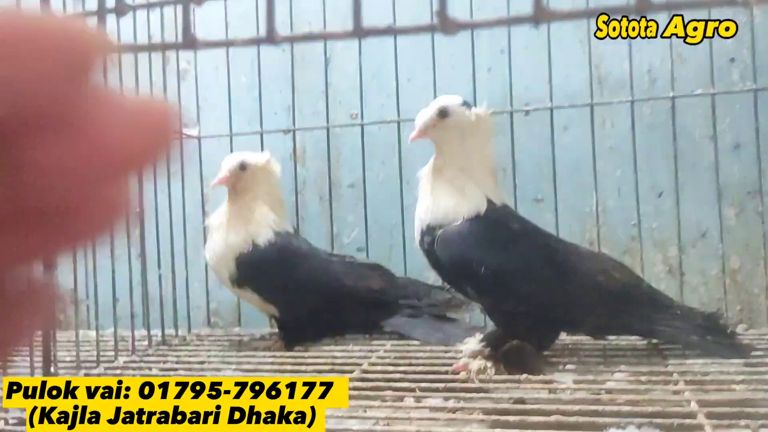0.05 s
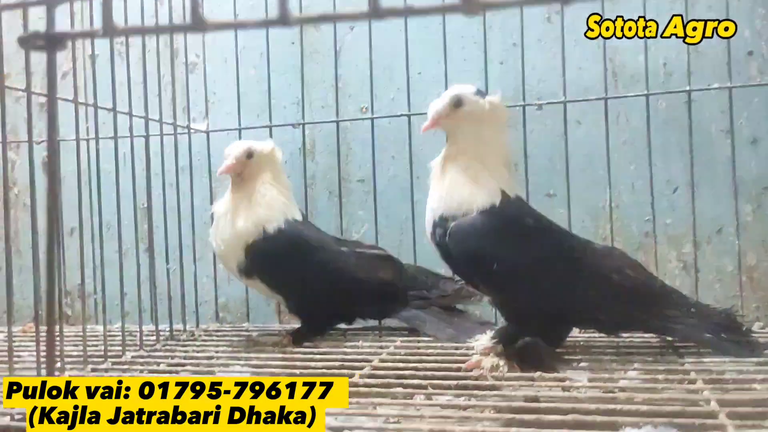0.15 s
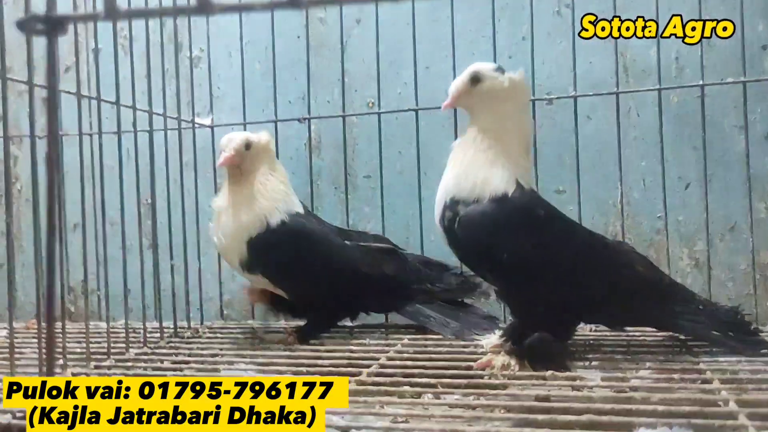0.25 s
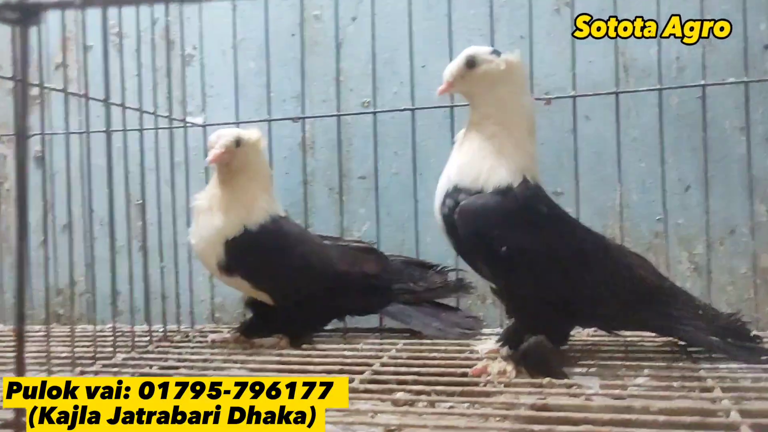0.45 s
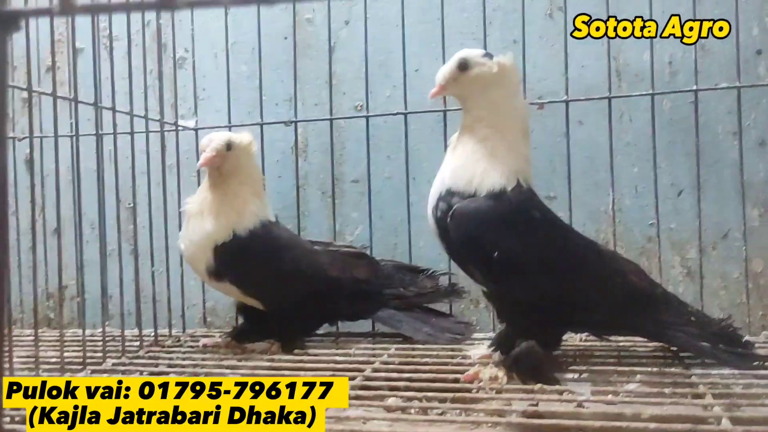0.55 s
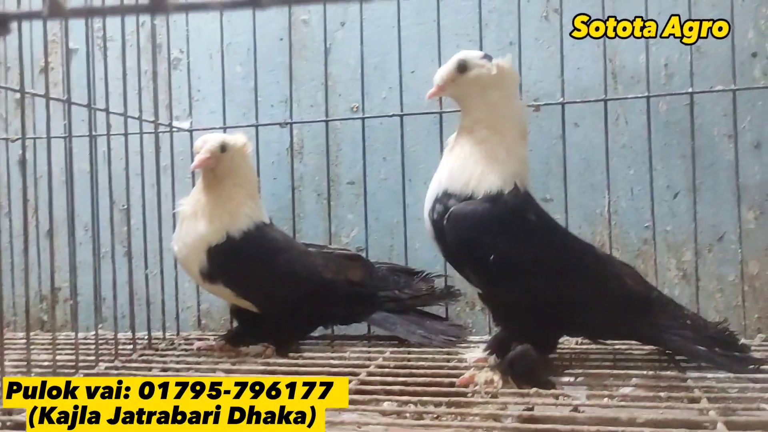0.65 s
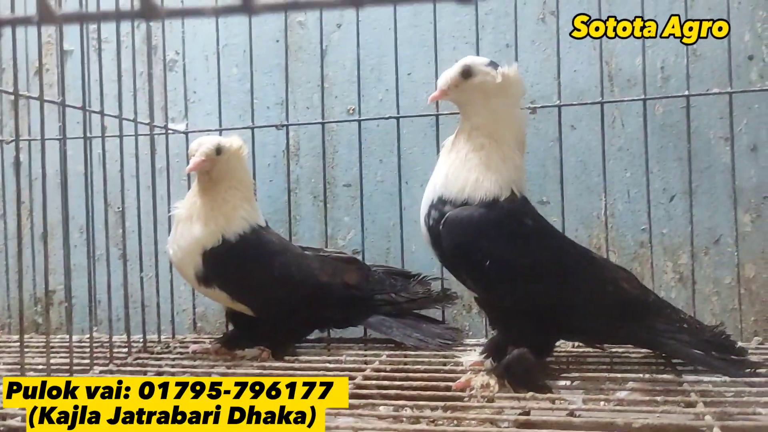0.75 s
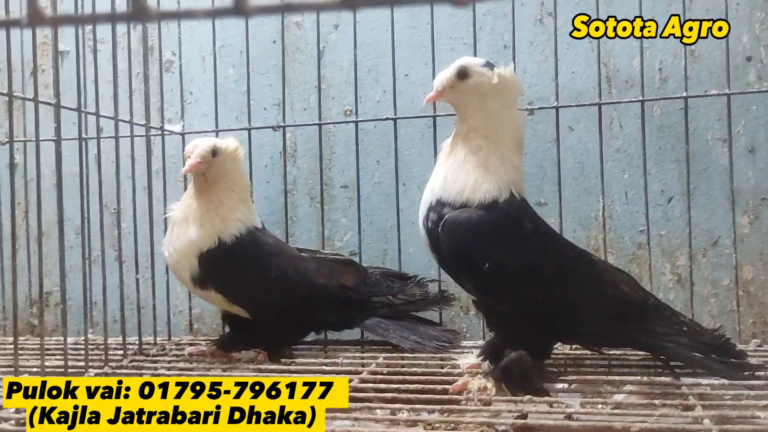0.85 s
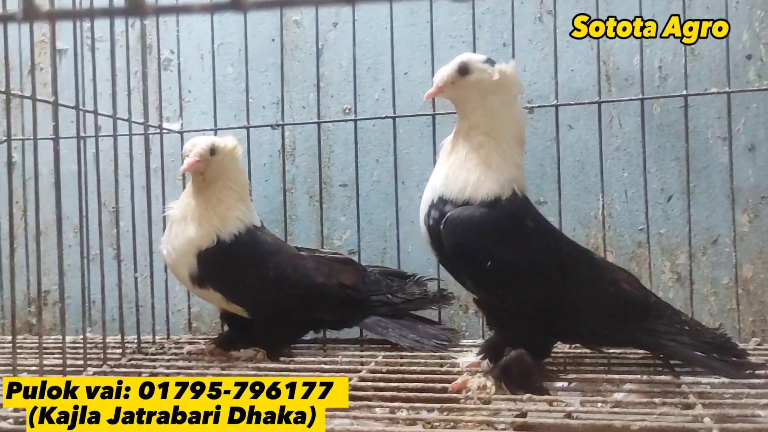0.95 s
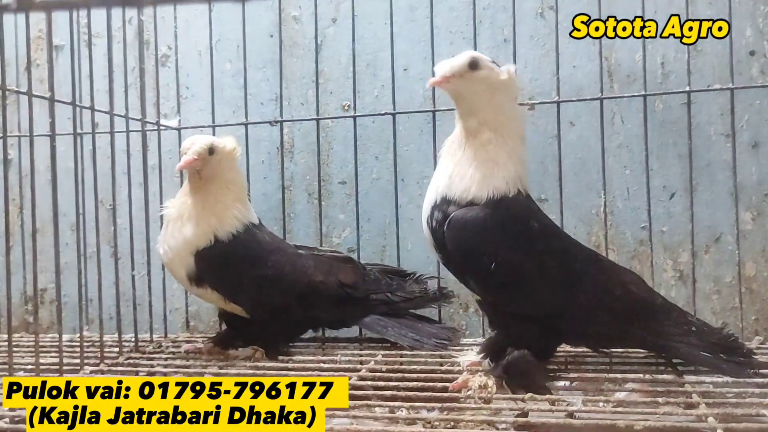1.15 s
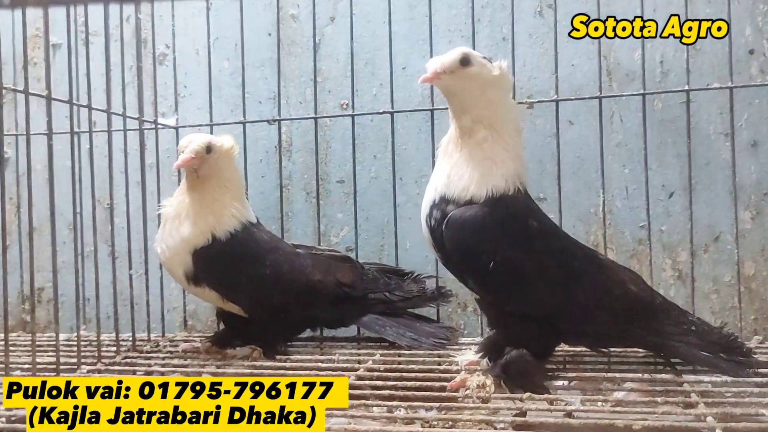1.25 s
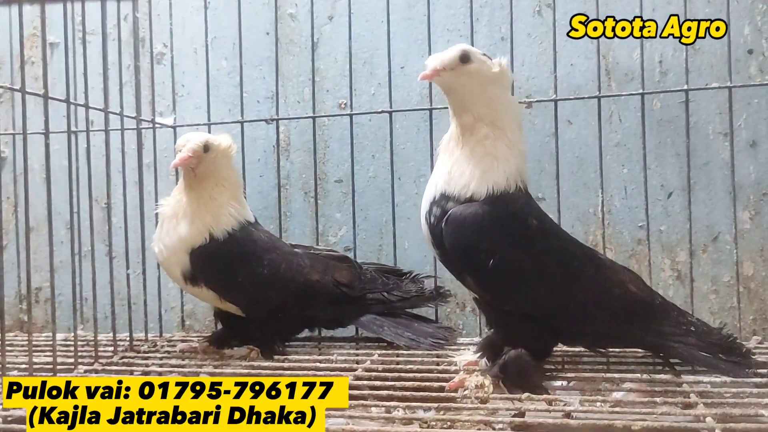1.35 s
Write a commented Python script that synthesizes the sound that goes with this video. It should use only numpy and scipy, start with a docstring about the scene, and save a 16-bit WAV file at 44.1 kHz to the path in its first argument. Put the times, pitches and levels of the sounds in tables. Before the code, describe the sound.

Low, breathy pigeon cooing starts after a brief quiet moment, rolls in quick pulses to a loud peak and dies away; a faint wing sweep and weak coo follow, over distant chirps and quiet low hum, one channel.

```python
"""A loft of wire cages: pigeons coo near and far, with small birds whistling outside.
Close to the microphone one bird throbs low, a wavering tone with breath around it; farther birds hold
softer tones. The flock murmurs behind as throbbing noise, over still air and a low hum with its third
harmonic. Feathers rustle and wings beat as swells of grainy noise; sharp broadband clicks fall, many at
the loud throbs. Pigeons, whistles and wings take on the sparse, short echoes of the loft."""
import sys
import numpy as np
from scipy import signal
from scipy.fft import rfft, irfft
from scipy.io import wavfile

SR = 44100
rng = np.random.default_rng(int(sys.argv[2]) if len(sys.argv) > 2 else 0)


def volts(x):
    """Linear amplitude factor 10**(x/20) for a level x in dB, scalar or array-like."""
    e = np.asarray(x, float) / 20
    return 10 ** e


def to_wav(sig):
    """Store sig (one row per channel, or 1-D mono) as 16-bit WAV at the path in sys.argv[1].

    Samples outside -1..1 are clipped; the rate is SR.
    """
    pcm = np.clip(np.atleast_2d(sig), -1, 1) * 32767
    pcm = np.round(pcm).astype(np.int16)
    wavfile.write(sys.argv[1], SR, pcm.T)  # frames by channels


N = 61739  # samples, 1.4 s


def seconds():
    """Time of every sample in seconds."""
    return np.arange(N) / SR


def evened(x):
    """Scales to rms 1."""
    return x / np.sqrt(np.mean(x ** 2) + 1e-20)


def slow(count, hz):
    """Smooth random wandering, rolled off above hz, rms about 1."""
    padded = count + 8192  # the spare samples keep the end from wrapping onto the start
    spectrum = rfft(rng.standard_normal(padded))
    rolloff = 1 + (np.fft.rfftfreq(padded, 1 / SR) / hz) ** 4
    return evened(irfft(spectrum / rolloff))[:count]


def coloured(x, points, stretch=1):
    """Filters x by a spectrum of (Hz, dB) points, its frequencies multiplied by stretch."""
    point_hz, point_db = np.transpose(points)
    hz = np.fft.rfftfreq(len(x), 1 / SR)
    gain_db = np.interp(np.log(hz + 1), np.log(point_hz * stretch), point_db)
    return irfft(rfft(x) * volts(gain_db), len(x))


def gate(start, length, edge):
    """A soft rise centred on the start, a hold, and a soft fall centred on the end."""
    t = seconds()
    nearest_end = np.minimum(t - start, start + length - t)
    return np.sin(np.pi / 2 * np.clip(nearest_end / edge + .5, 0, 1)) ** 2


def glide(start, length, from_hz, to_hz):
    """Running phase of a straight glide in pitch, from a random starting phase."""
    hz = np.interp(seconds(), [start, start + length], [from_hz, to_hz])
    return 2 * np.pi * (np.cumsum(hz) / SR + rng.random())


# Still air of the loft. Each row: frequency in Hz, relative level in dB per Hz.
AIR_SPECTRUM = [(20, 8), (53, -14.5), (100, -13), (400, -11.5), (720, -23.5), (1420, -34), (3240, -39),
                (4660, -44.5), (6000, -49), (8000, -52), (12000, -58.5), (15500, -65)]
AIR_DB = -42.5  # rms


def still_air():
    """Steady noise, strongest in the bass and thinning towards the treble."""
    return volts(AIR_DB) * evened(coloured(rng.standard_normal(N), AIR_SPECTRUM))


# Swells of the low hum under the loft. Each row: time in seconds, level in dB.
HUM_SWELLS = [(0, -50.5), (0.198, -41.5), (.3, -37.5), (.4, -50.5), (0.571, -38.5), (0.699, -45),
              (1.4, -48.5)]
HUM_HZ, HUM_DRIFT, HUM_DRIFT_HZ = 48.6, .025, 7.2  # pitch, rms drift as a fraction, speed of the drift
HUM_WAVER_DB, HUM_WAVER_HZ = 2.2, 16  # rms wavering of the level, and its speed
FIRST_DB, THIRD_DB = 0.0057, -14  # fundamental and third harmonic


def hum():
    """A low hum and its third harmonic, wavering in level and pitch."""
    s, db = np.transpose(HUM_SWELLS)
    hz = HUM_HZ * (1 + HUM_DRIFT * slow(N, HUM_DRIFT_HZ))
    phase = 2 * np.pi * np.cumsum(hz) / SR
    level = volts(np.interp(seconds(), s, db) + HUM_WAVER_DB * slow(N, HUM_WAVER_HZ))
    harmonics = volts(FIRST_DB) * np.sin(phase) + volts(THIRD_DB) * np.sin(3 * phase)
    return np.sqrt(2) * level * harmonics  # the root of 2 makes the levels rms


# Cooing of the flock behind. Each row: time in seconds, level in dB.
FLOCK_LEVELS = [(0, -39), (.06, -46), (.2, -30), (0.402, -32.5), (0.621, -26.5), (.8, -26), (.95, -28.5),
                (1.12, -40), (1.3, -37), (1.4, -32)]
# Spectrum of that cooing. Each row: frequency in Hz, relative level in dB per Hz.
FLOCK_SPECTRUM = [(90, -45), (150, -32), (232, -7.5), (320, 1), (414, 1), (520, -12.5), (650, -19.5),
                  (850, -31), (1300, -40.5), (2200, -84.5)]
FLOCK_THROB_DB, FLOCK_THROB_HZ = 2.8, 25  # rms depth and speed of the throbbing


def flock():
    """Many throats at once: a low band of noise that throbs."""
    s, db = np.transpose(FLOCK_LEVELS)
    throb = volts(np.interp(seconds(), s, db) + FLOCK_THROB_DB * slow(N, FLOCK_THROB_HZ))
    return throb * evened(coloured(rng.standard_normal(N), FLOCK_SPECTRUM))


# Whistles of small birds outside.
# Each row: start in seconds, length in seconds, start pitch in Hz, end pitch in Hz, roughness from 0 to 1.
WHISTLES = [(.0, .42, 2960, 2940, .4), (.32, .13, 2810, 2780, .5), (.12, .17, 4170, 4200, .7),
            (.19, .23, 3500, 3470, .55), (.3, .08, 4030, 4000, .55), (.49, .07, 1470, 1470, .5),
            (.555, .17, 4030, 3980, .8), (.865, .075, 3650, 3590, .6), (.93, .055, 4970, 4800, .6),
            (.96, .065, 4600, 4500, .5), (1.01, .06, 4260, 4170, .6), (1.05, .095, 4130, 3830, 1),
            (1.01, .13, 3420, 3280, .75), (.04, .09, 3550, 3500, .6), (.5, .09, 2800, 2790, .45),
            (.475, .075, 4150, 4050, .9), (.31, .12, 4520, 4470, .7)]
# Level of each whistle before its swell and fade. Each row: level in dB.
WHISTLE_LEVELS = [-55, -56, -60.5, -59.5, -59.5, -58.5, -60, -57, -67, -62, -53, -54.5, -65.5, -63.5, -67,
                  -62.5, -67]
WHISTLE_EDGE_S, WHISTLE_SPREAD_HZ, WHISTLE_FADE_DB = .025, 260, -5


def whistle(start, length, from_hz, to_hz, rough, db):
    """A thin tone that swells and fades, blurred by echoes into a fluttering band."""
    phase = glide(start, length, from_hz, to_hz)
    spread_hz = WHISTLE_SPREAD_HZ * rough ** 1.5
    in_step = (1 - rough + rough * slow(N, spread_hz)) * np.sin(phase)
    out_of_step = rough * slow(N, spread_hz) * np.cos(phase)
    # loudest at two fifths of the length
    fade_db = WHISTLE_FADE_DB * abs(2 * (seconds() - start) / length - .8)
    return volts(db + fade_db) * gate(start, length, WHISTLE_EDGE_S) * evened(in_step + out_of_step)


# Held coos of pigeons farther off.
# Each row: start in seconds, length in seconds, start pitch in Hz, end pitch in Hz, level in dB before throbbing.
FAR_COOS = [(0.056, 0.03, 499.7, 493, -30.5), (0.08, 0.086, 312.6, 315, -33), (0.099, 0.038, 622, 626, -30),
            (0.124, 0.079, 495, 484, -33.5), (0.127, .08, 719, 684, -38.5),
            (0.222, 0.12, 504.4, 477.6, -34.5), (0.097, .17, 789, 817, -50),
            (0.444, 0.068, 676, 688, -34.5), (0.501, 0.074, 610, 620, -39.5),
            (0.781, 0.17, 284.8, 271.7, -28), (0.991, 0.081, 355.5, 415, -25.5),
            (1.243, 0.093, 788, 933, -47.5), (1.349, 0.03, 553, 547, -35.5)]
COO_THROB_HZ, COO_THROB, COO_EDGE_S = 50, .35, .016  # speed and rms depth of the throb, soft edge
COO_HOARSE = .4  # rms wandering of the phase in radians


def far_coo(start, length, from_hz, to_hz, db):
    """A soft held tone that throbs unevenly, made hoarse by a wandering phase."""
    throb = 1 + COO_THROB * slow(N, COO_THROB_HZ)
    phase = glide(start, length, from_hz, to_hz) + COO_HOARSE * slow(N, COO_THROB_HZ)
    return volts(db) * gate(start, length, COO_EDGE_S) * throb * np.sin(phase)


# Throbs of the coos close to the microphone. Each row: middle in seconds, peak level in dB before the rattle,
# pitch in Hz before the waver, width in seconds at half amplitude.
NEAR_THROBS = [(0.241, -18.5, 331.6, 0.041), (0.275, -16.5, 329.9, 0.06845), (0.311, -17, 335.6, 0.083),
               (0.341, -15, 337.3, 0.015), (0.372, -19, 312.3, 0.025), (.405, -26.5, 319.9, 0.0093),
               (0.447, -23.5, 305.2, 0.025), (0.477, -16.5, 326.2, 0.023), (0.492, -17, 322.4, 0.011),
               (0.504, -17, 348.7, 0.0094), (0.519, -17, 329.6, 0.012), (0.552, -16.5, 294.1, 0.0069),
               (0.562, -15.5, 291.1, 0.0091), (0.581, -19.5, 388.5, 0.007), (0.625, -16, 282.6, 0.01766),
               (0.657, -20, 384.5, 0.011), (0.672, -13, 376.9, 0.014), (0.685, -16, 332.6, 0.009),
               (0.696, -15, 364.1, 0.008), (0.714, -14.5, 354.7, 0.008), (0.74, -9.5, 384.7, 0.022),
               (0.756, -9, 375.7, 0.016), (0.772, -15, 363.6, 0.009), (0.792, -4, 386.6, 0.014),
               (0.819, -7.5, 384.8, 0.015), (0.86, -11, 340.5, 0.024), (0.893, -15, 413.2, 0.013),
               (0.911, -12, 399.1, 0.013), (0.93, -8.5, 381.8, 0.016), (0.976, -11.5, 373.3, 0.017),
               (1.05, -17.5, 402.2, 0.026), (1.087, -22.5, 381.6, 0.0093), (1.113, -18, 371.9, 0.021),
               (1.348, -21, 354.7, 0.013), (1.382, -23.5, 367.6, 0.04)]
WAVER, WAVER_HZ = 0.014, 60.7  # rms waver of the pitch as a fraction, and its speed
BREATH_DB, BREATH_WIDTH_HZ = -11.5, 88.6  # breath relative to the tone, and its spread about the pitch
RATTLE_HZ, RATTLE, RATTLE_END_S, RATTLE_EDGE_S = 76, .22, .55, .27  # flutter of the throat in the early coos


def near_pigeon():
    """An almost pure tone from the swollen throat, pressed out in throbs, with breath around it."""
    t = seconds()
    s, db, hz, width = np.array(NEAR_THROBS).T[:, :, None]
    bells = volts(db) ** 2 * np.exp(-np.log(4) * (2 * (t - s) / width) ** 2)
    power = bells + 1e-12 / (1 + abs(t - s))  # the trace of power keeps a pitch defined in the gaps
    total = power.sum(0)
    pitch = (power * hz).sum(0) / total * (1 + WAVER * slow(N, WAVER_HZ))
    phase = 2 * np.pi * np.cumsum(pitch) / SR
    flutter = np.sin(2 * np.pi * RATTLE_HZ * t)
    rattle = 1 + RATTLE * gate(0, RATTLE_END_S, RATTLE_EDGE_S) * flutter
    breath = slow(N, BREATH_WIDTH_HZ) * volts(BREATH_DB)
    return np.sqrt(total) * (rattle * np.sin(phase) + breath * np.cos(phase))


WHOOSH_DB, WHOOSH_WIDTH_HZ = 6, 180  # lift of the noise around the whoosh, and its reach


def feathers(start, length, db, spectrum, stretch=1, whoosh_hz=0):
    """Grainy air through feathers: a soft swell and fall, with a breathy pitch where the wing sweeps."""
    u = np.clip((seconds() - start) / length, 0, 1)
    grain = rng.standard_normal(N) * volts(2.5 * slow(N, 250))  # flutters by 2.5 dB rms
    away = (np.fft.rfftfreq(N, 1 / SR) - whoosh_hz) / WHOOSH_WIDTH_HZ
    whoosh = irfft(rfft(grain) * volts(WHOOSH_DB * np.exp(-away ** 2)), N)
    swell = abs(np.sin(np.pi * u ** .72)) ** 1.5  # rises faster than it falls
    return volts(db) * swell * evened(coloured(whoosh, spectrum, stretch))


# Feather rustles in the cages. Each row: start in seconds, length in seconds, level in dB.
RUSTLE_TIMES = [(0.239, .11, -56.5), (0.452, 0.14, -60), (0.593, 0.1, -59.5)]
# Spectrum of a rustle. Each row: frequency in Hz, relative level in dB per Hz.
RUSTLE_SPECTRUM = [(800, -34), (2000, -4), (4000, -5), (5500, -13.5), (7000, -7.5), (8300, -26.5),
                   (9500, -17), (12000, -36.5)]


def rustles():
    """Feathers rustling: short bright swells of grainy noise."""
    return sum(feathers(*row, RUSTLE_SPECTRUM) for row in RUSTLE_TIMES)


# Sharp broadband clicks, many at the loud throbs.
# Each row: time in seconds, level in dB before the click spectrum, top of the snap in Hz.
CLICKS = [(.351, -40, 11000), (.632, -37, 14000), (.671, -36, 9500), (.732, -41, 7500), (.738, -41, 7500),
          (.756, -31, 9500), (.763, -41, 10000), (.798, -28, 9500), (.816, -33, 7500), (.823, -34, 7500),
          (.841, -35, 10000), (.861, -32, 15000), (.868, -33, 13500), (.926, -27, 8700), (.946, -38, 8500),
          (1.051, -39, 12000)]
# Spectrum of the clicks. Each row: frequency in Hz, gain in dB.
CLICK_SPECTRUM = [(500, -18), (1200, 8), (3000, 5), (5000, 0), (8000, -3), (15000, -8)]
CLICK_T60_S, CLICK_TAIL_DB = .009, -21  # time for the tail to fall 60 dB, and its start below the snap
FAINT_PER_S, FAINT_DB = 30, -47  # faint clicks: average rate, level before the click spectrum


def clicks():
    """Each click is a sharp snap with a tiny noisy tail; faint ones fall at random."""
    t = np.arange(400) / SR
    faint = rng.standard_normal(N) * (rng.random(N) < FAINT_PER_S / SR)
    out = faint * volts(FAINT_DB)
    for s, db, top_hz in CLICKS:
        tail = volts(CLICK_TAIL_DB - 60 * t / CLICK_T60_S) * rng.standard_normal(400)
        snap = (t == 0) + tail
        b, a = signal.butter(8, top_hz, fs=SR)
        out[round(s * SR):][:400] += volts(db) * signal.lfilter(b, a, snap)
    return coloured(out, CLICK_SPECTRUM)


# Wing beats in the loft. Each row: start in seconds, length in seconds, level in dB,
# brightness as a stretch of the spectrum, pitch of the whoosh in Hz.
WING_BEATS = [(0.585, 0.15, -44.5, 1.32, 1170), (0.653, .2, -53.5, 0.89, 1241),
              (1.218, 0.17, -45.5, 0.95, 1410)]
# Spectrum of a wing beat before its stretch. Each row: frequency in Hz, relative level in dB per Hz.
WING_SPECTRUM = [(400, -32), (620, -4.5), (850, 1.5), (1450, -6.5), (2050, -10), (2450, -33), (5000, -50.5)]


def wing_beats():
    """Wings sweeping air: swells of grainy noise with a breathy pitch."""
    beats = [feathers(start, length, db, WING_SPECTRUM, stretch, whoosh_hz)
             for start, length, db, stretch, whoosh_hz in WING_BEATS]
    return sum(beats)


LOFT_T60_S, LOFT_DB = .2, -13  # time for the echoes to fall 60 dB, their level against the direct sound


def loft(x):
    """Sparse echoes of random sign dying away, none before 4 ms."""
    t = np.arange(SR // 2) / SR
    sparse = rng.standard_normal(len(t)) * (rng.random(len(t)) < .05)
    tail = sparse * volts(-60 * t / LOFT_T60_S) * (t > .004)
    echoes = signal.fftconvolve(x, tail / np.linalg.norm(tail))[:N]
    return x + volts(LOFT_DB) * echoes


def scene():
    """Birds and wings echo in the loft; clicks, flock, air and hum are added without echoes."""
    pigeons = near_pigeon() + sum(far_coo(*row) for row in FAR_COOS)
    small_birds = sum(whistle(*row, db) for row, db in zip(WHISTLES, WHISTLE_LEVELS))
    wings = wing_beats() + rustles()
    air = still_air()
    mix = loft(pigeons + small_birds + wings) + clicks() + flock() + air + hum()
    return mix[None]  # one channel


def roll_off(x):
    """The treble ends steeply here."""
    return signal.sosfilt(signal.butter(12, 15600, fs=SR, output="sos"), x)


def record(dry):
    """Takes the finished mix at the level it has."""
    return roll_off(dry)


dry = scene()
out = record(dry)
to_wav(out)
```